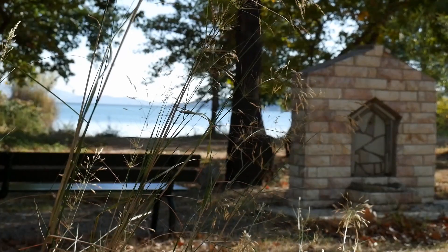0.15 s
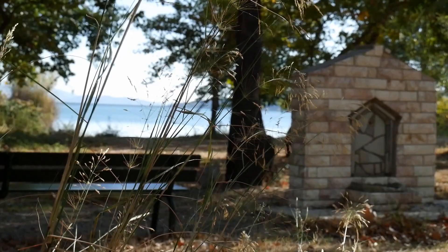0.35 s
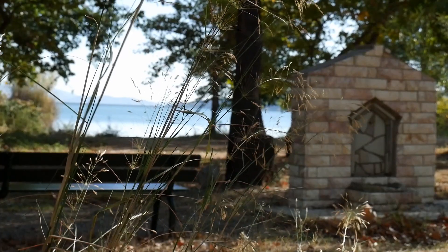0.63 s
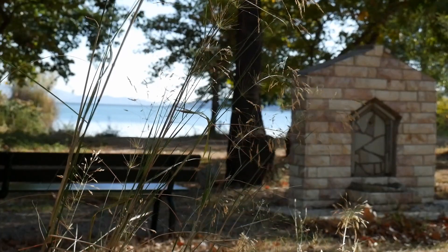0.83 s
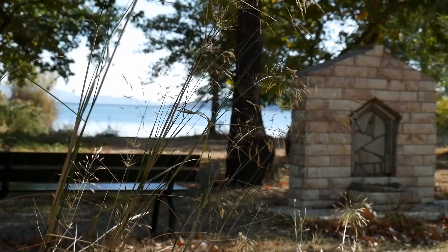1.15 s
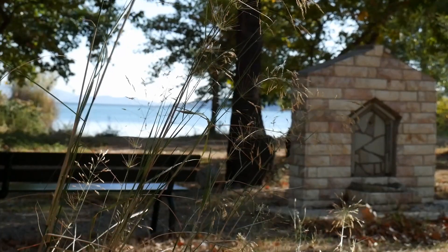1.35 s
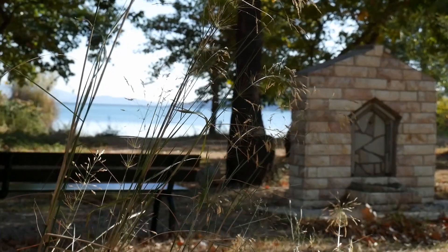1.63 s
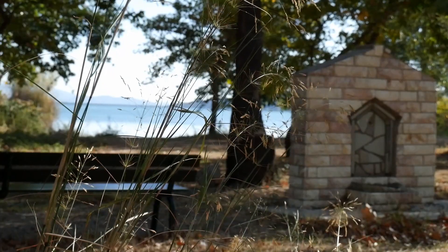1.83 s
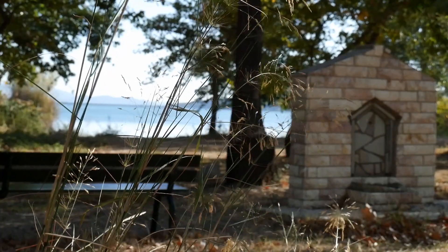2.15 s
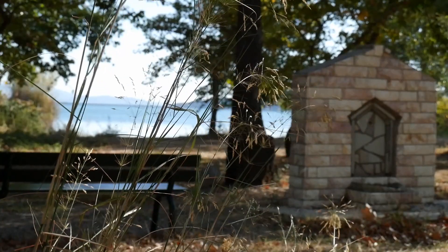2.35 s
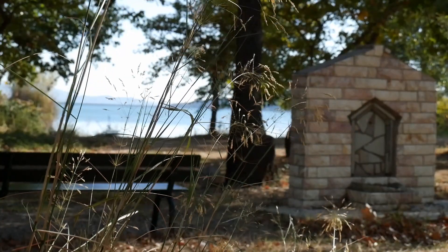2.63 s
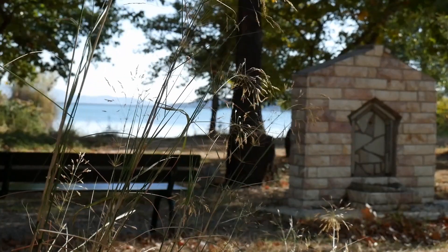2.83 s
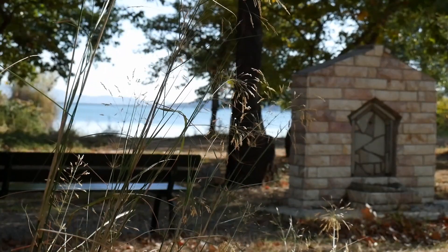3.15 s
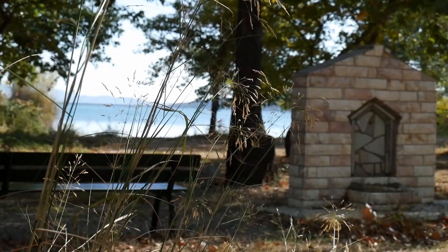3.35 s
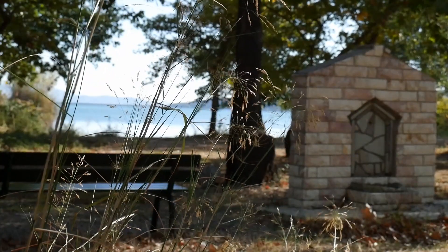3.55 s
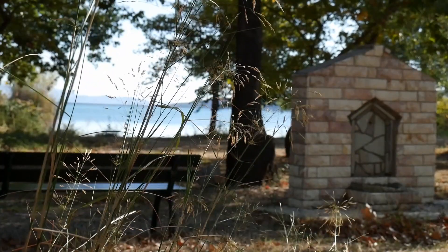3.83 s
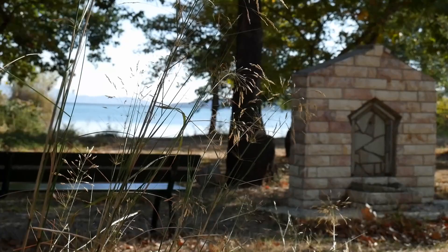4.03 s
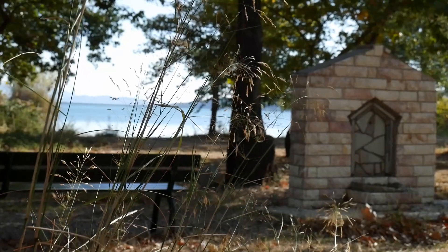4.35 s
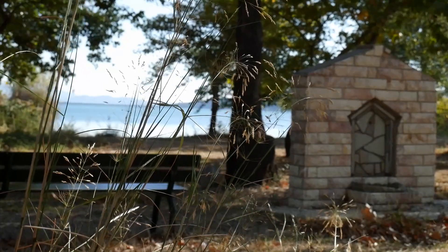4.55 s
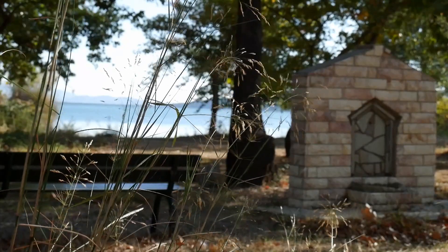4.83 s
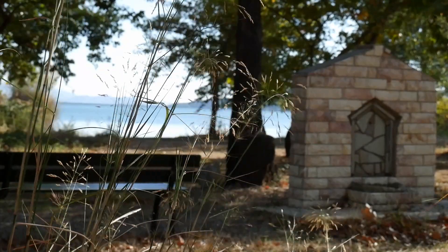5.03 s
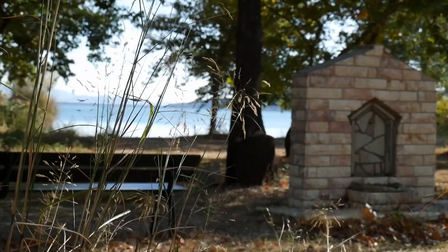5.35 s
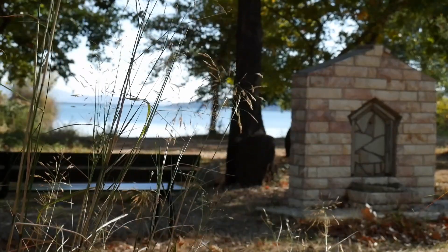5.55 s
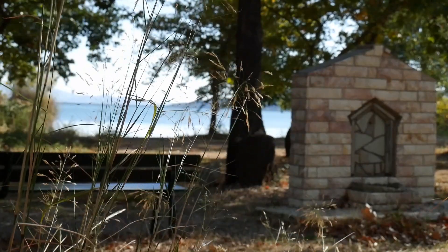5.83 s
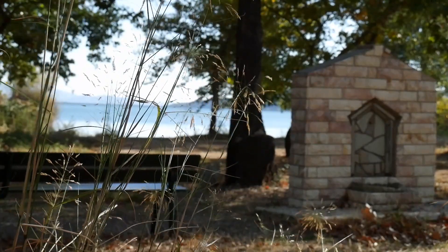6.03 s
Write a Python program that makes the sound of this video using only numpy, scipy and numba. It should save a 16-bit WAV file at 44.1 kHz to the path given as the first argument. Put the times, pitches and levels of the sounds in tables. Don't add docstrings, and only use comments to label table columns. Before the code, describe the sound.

From 0 s a small single-cylinder motorbike is already near, its firings a fast, low thudding drone at about 34 pulses a second, slightly uneven at first. It passes around 0.7 s, roughly four metres away, with hollow pipe and airbox resonances, a throaty exhaust and a soft rush of tyres and valve clatter, pushed up by throttle near 0.9 s. From 1 to 4 s it draws steadily away, running evenly and wavering slightly behind tree trunks, the treble fading before the bass; a short dull bodywork rattle comes at 2.2 s. Around 4.4 s the throttle closes: the pitch sinks to about 29 pulses a second and the sound thins to a soft, distant putter through 6 s. A small dry twig tick lands at 5.6 s. Beneath lie quiet park air, very faint traffic rumble and light microphone hiss, in narrow, near-central stereo with diffuse treble.

```python
import sys
import numpy as np
from scipy import signal
from scipy.fft import rfft, irfft
from scipy.io import wavfile
from scipy.ndimage import uniform_filter1d
from numba import njit

SR = 44100
rng = np.random.default_rng(int(sys.argv[2]) if len(sys.argv) > 2 else 0)


def int16_out(signal):
    q = np.round(np.clip(np.atleast_2d(signal).T, -1, 1) * 32767)
    wavfile.write(sys.argv[1], SR, q.astype(np.int16))


def makeup_ratio(level_db):
    decades = np.asarray(level_db, float) / 20
    return 10 ** decades


N = 272538


def level(x, db):
    return x * makeup_ratio(db) / np.sqrt(np.mean(x ** 2))


def read(table):
    s, *columns = np.transpose(table)
    return [np.interp(np.arange(N) / SR, s, c) for c in columns]


def shape(x, table):
    hz, db = np.transpose(table)
    f = np.maximum(np.arange(N // 2 + 1) * SR / N, 1)
    gain_db = np.interp(np.log(f), np.log(hz), db)
    return irfft(rfft(x) * makeup_ratio(gain_db), N)


@njit
def svf(x, hz, width):
    y, band, low = np.empty(len(x)), 0., 0.
    g, k = np.tan(np.pi * hz / SR), width / hz
    for i in range(len(x)):
        v = (band + g * (x[i] - low)) / (1 + g * (g + k))
        band, low, y[i] = 2 * v - band, low + 2 * g * v, k * v
    return y


def ring_twice(x, hz, width):
    hz, width = float(hz), float(width)
    return svf(svf(x, hz, width), hz, width)


def ring(x, modes):
    total = 0
    for hz, width, db in modes:
        total = total + makeup_ratio(db) * level(ring_twice(x, hz, 1.84 * width), 0)
    return level(total, 0)


def walk(rate):
    k = int(SR / rate)
    steps = np.repeat(rng.standard_normal(N // k + 1), k)
    return 1.3 * uniform_filter1d(uniform_filter1d(steps, k), k)[:N]


def bands(table, swell_db, flicker_db):
    noise, swell, out = shape(rng.standard_normal(N), table), walk(3), 0
    for hz in 200 * 2 ** np.arange(0, 6.6, .5):
        gain_db = swell_db * swell + flicker_db * walk(9)
        out = out + makeup_ratio(gain_db) * svf(noise, hz, hz / 3)
    return level(out, 0)


# frequency in Hz, density in dB per Hz.
TRAFFIC_SPECTRUM = [(20, -10.5), (40, 3.5), (60, 2), (100, 6), (150, -4), (220, -44), (500, -95)]


def traffic():
    return makeup_ratio(1.2 * walk(2.127)) * level(shape(rng.standard_normal(N), TRAFFIC_SPECTRUM), -41)


# frequency in Hz, density in dB per Hz.
PARK_SPECTRUM = [(120, -31), (200, 9), (327, -12), (365, -15), (454, -39), (544, -33.5), (575, -8.5),
                 (1170, -3.5), (1710, -17.5), (3420, -12), (3960, -21), (15500, -30.5)]
# frequency in Hz, gain in dB.
CAPSULE_GAIN = [(4000, 0.5), (4800, -0.5), (5450, 9.5), (6100, 3)]


def park():
    return shape(makeup_ratio(-55) * bands(PARK_SPECTRUM, swell_db=.4, flicker_db=.7), CAPSULE_GAIN)


# time in seconds, peak level in dB.
TWIG_TICKS = [
    (5.5987, -38.5),
]


def twig():
    burst = np.zeros(N)
    decay = np.exp(-np.arange(600) / 200)
    for s, db in TWIG_TICKS:
        burst[int(s * SR):][:600] += makeup_ratio(db) * rng.standard_normal(600) * decay
    return 4.5 * ring_twice(burst, 3430, 350) + 3 * ring_twice(burst, 2620, 250)


def trees(x):
    i, out = np.arange(N), 0
    for lag_s, stretch, sign in rng.uniform((.005, -.004, -1), (.09, .008, 1), (6, 3)):
        out = out + sign * np.interp(i - lag_s * SR - stretch * (i - N / 4), i, x)
    return shape(out, [(120, -16), (400, 0)])


# time in seconds, decay in seconds, level in dB.
BUMPS = [
    (2.175, .1, -36),
]
# frequency in Hz, width in Hz, level in dB.
PANEL_MODES = [(230, 83, -1.5), (420, 100, 1), (565, 140, -1)]


def bump():
    t, shake = np.arange(N) / SR, 0
    for s, decay_s, db in BUMPS:
        rise = np.clip((t - s) / 0.018, 0, 1)
        shake = shake + makeup_ratio(db) * rise * np.exp(-np.maximum(t - s, 0) / decay_s)
    return shake * makeup_ratio(3.6 * walk(40)) * ring(rng.standard_normal(N), PANEL_MODES)


def front(along_m, db, turn_m, over_m):
    return db / (1 + np.exp(np.clip((along_m - turn_m) / over_m, -50, 50)))


def header_rear(along_m):
    return front(along_m, db=7, turn_m=0.88, over_m=0.97)


def waver():
    return 1.2 * walk(7)


# frequency in Hz, width in Hz, level in dB.
CASING_MODES = [(890, 90, -14), (1190, 70, -12.5), (2420, 240, -21), (3290, 190, -22.5), (5420, 300, -36)]


def casing(clatter, sight_db):
    out = 0
    for hz, width, db in CASING_MODES:
        out = out + makeup_ratio(db + 2.5 * walk(3)) * ring(clatter, [(hz, width, 0)])
    return makeup_ratio(0.96 * sight_db) * out


# frequency in Hz, density in dB per Hz.
RUSH_SPECTRUM = [(150, -39.5), (250, -8), (312, -5), (349, -6), (663, -11.5), (889, -11.5), (2460, -22.5),
                 (2870, -24.5), (3300, -29), (3740, -33), (5450, -42.5), (7000, -50), (9100, -104.5),
                 (15400, -120)]


def rush(gate, clatter, along_m, far_db, sight_db):
    sound = (1 + .3 * (gate - 1)) * bands(RUSH_SPECTRUM, swell_db=.3, flicker_db=.8)
    sound = sound + casing(clatter, sight_db)
    low = shape(sound, [(1200, 0), (1900, -40)])
    low_db = far_db - 31.5 + sight_db
    high_db = far_db - 30 + front(along_m, db=2.1, turn_m=1.01, over_m=0.33) + .45 * sight_db
    return makeup_ratio(low_db) * low + makeup_ratio(high_db) * (sound - low)


# frequency in Hz, width in Hz, level in dB.
ROAR_MODES = [(245, 104, 0)]


def roar(clatter, along_m, far_db, throttle_db):
    db = far_db - 36 - header_rear(along_m) + 0.96 * throttle_db + waver()
    return makeup_ratio(db) * ring(clatter, ROAR_MODES)


# frequency in Hz, gain in dB.
SILENCER_GAIN = [(240, -50), (315, -14), (345, 0), (385, 0), (420, -2), (455, -3), (490, -10), (560, -18),
                 (625, -11), (700, -26), (1000, -70)]


def silencer(drive, along_m, far_db, throttle_db):
    lag_s = .019
    tone = np.roll(level(shape(drive, SILENCER_GAIN), 0), int(lag_s * SR))
    lower = shape(tone, [(360, 0), (410, -30)])
    tone = lower + makeup_ratio(.6 * far_db + 1.3) * (tone - lower)
    db = far_db - 28 - front(along_m, db=12.3, turn_m=-0.86, over_m=0.79) + throttle_db + waver()
    return makeup_ratio(db) * tone


# frequency in Hz, width in Hz, level in dB.
AIRBOX_MODES = [(164, 24, -1), (207.1, 27, -9.5), (279, 55, -18.5)]


def airbox(drive, along_m, far_db, throttle_db, sight_db):
    db = far_db - 31 + front(along_m, db=11.2, turn_m=0.56, over_m=0.55)
    db = db + sight_db + 0.75 * throttle_db + waver()
    return -makeup_ratio(db) * ring(drive, AIRBOX_MODES)


# frequency in Hz, width in Hz, level in dB.
HEADER_MODES = [(139.2, 31, 0)]


def header(drive, along_m, far_db, rumble):
    facing_db = front(along_m, db=7.6, turn_m=-3.5, over_m=0.42) - header_rear(along_m)
    db = far_db - 25.5 + facing_db + 5.5 * rumble + waver()
    return -makeup_ratio(db) * ring(drive, HEADER_MODES)


def pipe(x):
    harmonic = np.minimum(np.arange(N // 2 + 1) * SR / N / 35, 8)
    phase_rad = -.035 * harmonic ** 2
    return irfft(rfft(x) * np.exp(1j * phase_rad), N)


# frequency in Hz, gain in dB.
THUMP_GAIN = [(10, -30), (24, 5.5), (35, 2), (70, 5), (105, -0.5), (125, -1), (180, -72)]


def thump(drive, far_db, throttle_db):
    sound = level(pipe(shape(drive, THUMP_GAIN)), 0)
    sound = makeup_ratio(far_db - 19.5 + .08 * np.maximum(throttle_db, -8)) * sound
    deep_db = -.5 - .2 * far_db
    return sound + (makeup_ratio(deep_db) - 1) * shape(sound, [(42, 0), (58, -30)])


def fire(hz, misfire):
    turns = np.cumsum(hz) / SR
    at = np.flatnonzero(np.diff(np.floor(turns)))
    timing, size = rng.standard_normal((N // 500, 2))[:len(at)].T
    late = misfire[at] * 0.12 * timing * SR / hz[at]
    pulses = np.zeros(N)
    pulses[np.clip(at + late, 0, N - 1).astype(int)] = -makeup_ratio(misfire[at] * 12 * size)
    return level(pulses, 0), turns % 1


# time in seconds, firing rate in Hz as heard, throttle in dB,
# clear line of sight between the trunks in dB.
RIDE = [(0, 34.46, -3, 0.5), (.14, 34.09, -4, -2), (.33, 33.98, -2.5, 1), (.62, 34.55, -5.5, -1.5),
        (.85, 35.23, 3, 3.5), (1.15, 34.69, 0, 2), (1.44, 34.53, 2.5, -2.5), (1.8, 34.26, 4, -1.5),
        (2.3, 34.27, -2.5, -2), (2.6, 34.25, 0.5, -1.5), (2.92, 34.63, 1.5, 0), (3.5, 35.66, 2.5, 1),
        (3.8, 35.18, 1.5, -0.5), (4.3, 34.9, 0, -1.5), (4.47, 32.4, -15, -3), (4.72, 30.26, -7, -2.5),
        (5.3, 28.95, -17, -0.5), (6.18, 29.39, -27, 0.5)]
# time in seconds, misfire from 0 to 1,
# share of the low sound that is rumble rather than firings from 0 to 1.
EVENNESS = [(0, .2, .5), (.3, .1, .33), (.8, .06, .25), (1.1, .05, .2), (1.4, .04, .15), (4.3, .045, .16),
            (4.5, .13, .36), (5.3, .12, .36), (6.18, .12, .42)]


def motor():
    hz, throttle_db, sight_db = read(RIDE)
    misfire, rumble = read(EVENNESS)
    passes_s, speed_m_s, road_m = 0.74, 5.91, 3.97
    along_m = speed_m_s * (np.arange(N) / SR - passes_s)
    far_db = -20 * np.log10(np.hypot(along_m, road_m) / road_m)
    pulses, phase = fire(hz, misfire)
    drive = np.sqrt(1 - rumble ** 2) * pulses + rumble * rng.standard_normal(N)
    push = int(.0008 * SR)
    drive = uniform_filter1d(uniform_filter1d(drive, push), push)
    gate = 1 + 0.13 * np.cos(2 * np.pi * (phase - .6)) + 0.3 * np.cos(4 * np.pi * (phase - .1))
    clatter = gate * rng.standard_normal(N)
    return (thump(drive, far_db, throttle_db)
            + header(drive, along_m, far_db, rumble)
            + airbox(drive, along_m, far_db, throttle_db, sight_db)
            + silencer(drive, along_m, far_db, throttle_db)
            + roar(clatter, along_m, far_db, throttle_db)
            + rush(gate, clatter, along_m, far_db, sight_db))


# frequency in Hz, side minus mid in dB.
STEREO_WIDTH = [(60, -42), (200, -46), (450, -31), (800, -27), (2400, -23), (4400, -14), (7000, -4),
                (15000, -2)]
# frequency in Hz, left minus right in dB.
STEREO_LEAN = [(350, 0), (700, -1), (3000, -.9), (8000, -.4)]


def scene():
    bike = motor()
    echoes = trees(bike)
    mid = bike + makeup_ratio(-15.5) * echoes + park() + twig() + traffic() + bump()
    side = shape(makeup_ratio(-2) * echoes + park(), STEREO_WIDTH)
    lean = np.array(STEREO_LEAN) * [1, .5]
    left = shape(mid, lean) + side
    right = shape(mid, lean * [1, -1]) - side
    return np.array([left, right])


def top_cut(x):
    return signal.sosfilt(signal.butter(12, 15690, fs=SR, output="sos"), x)


def record(dry):
    return top_cut(dry)


dry = scene()
out = record(dry)
int16_out(out)
```